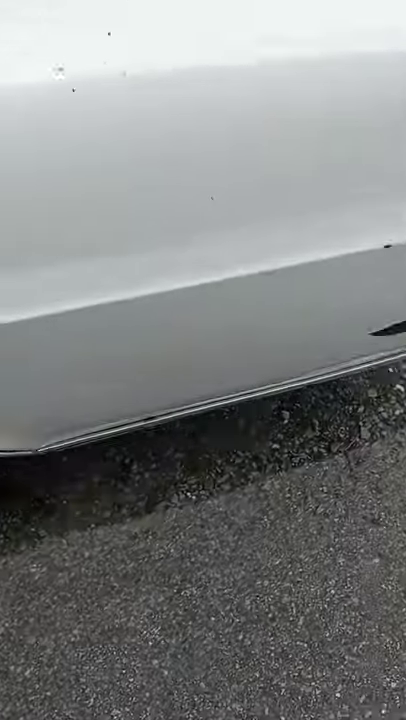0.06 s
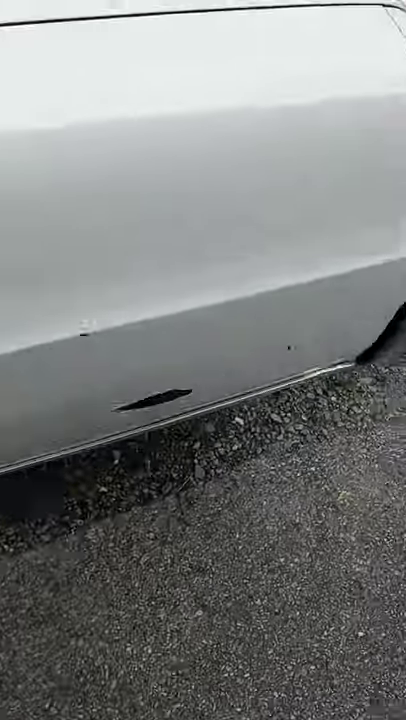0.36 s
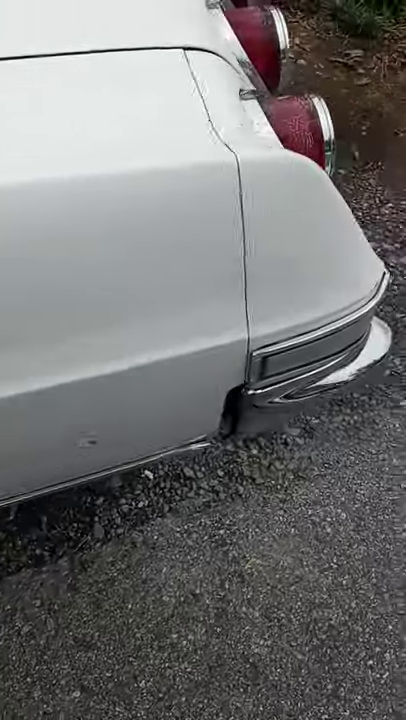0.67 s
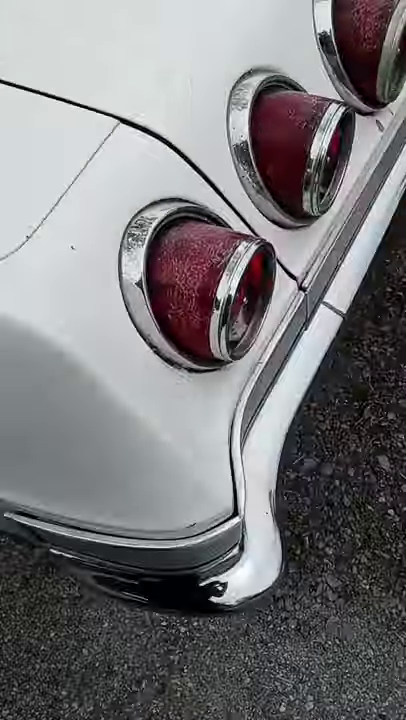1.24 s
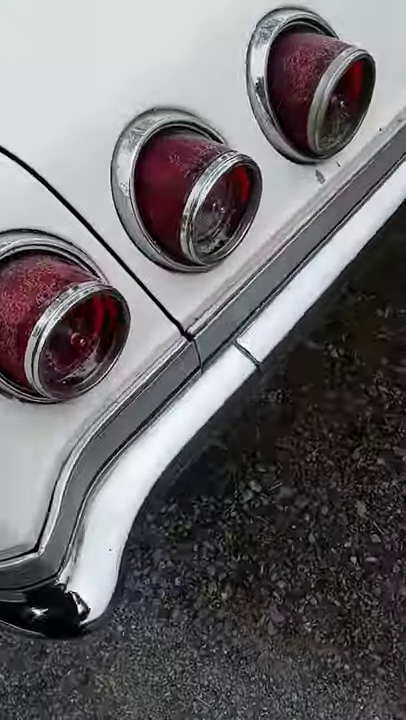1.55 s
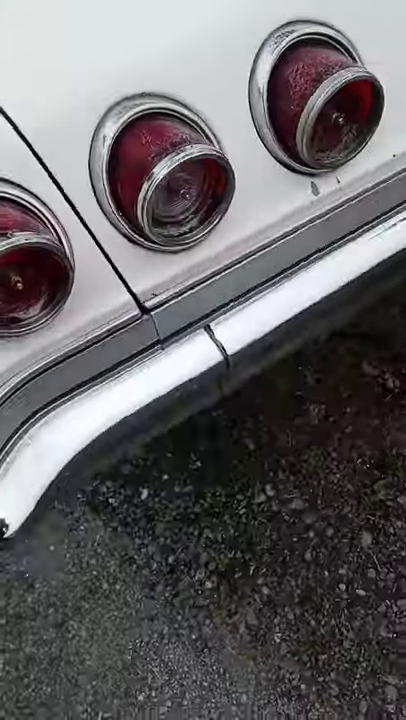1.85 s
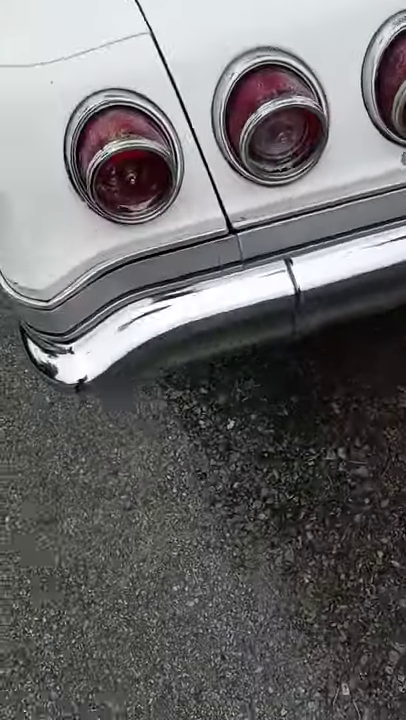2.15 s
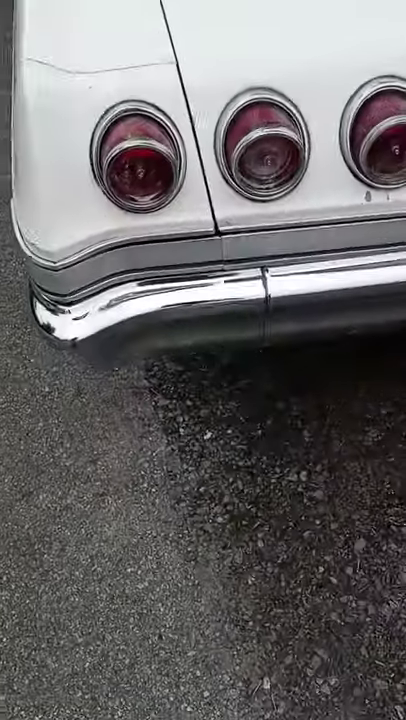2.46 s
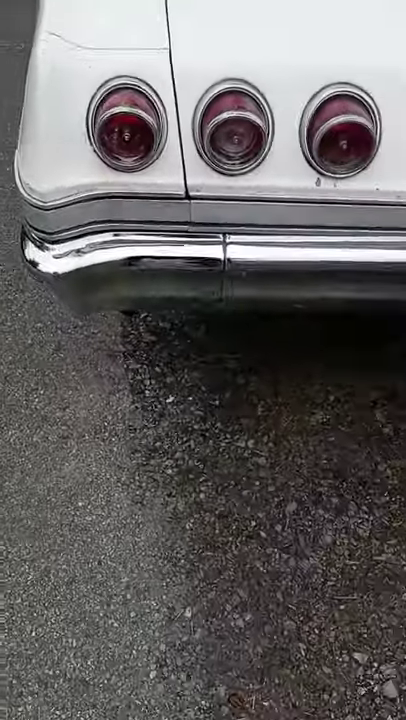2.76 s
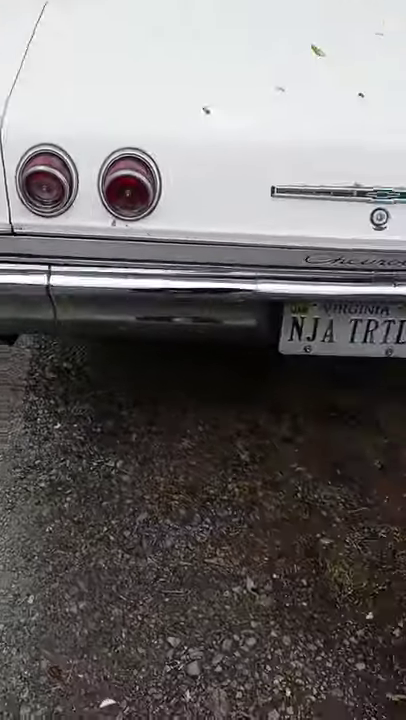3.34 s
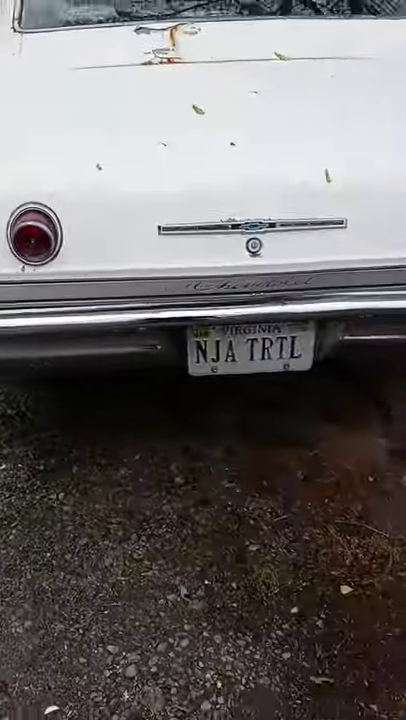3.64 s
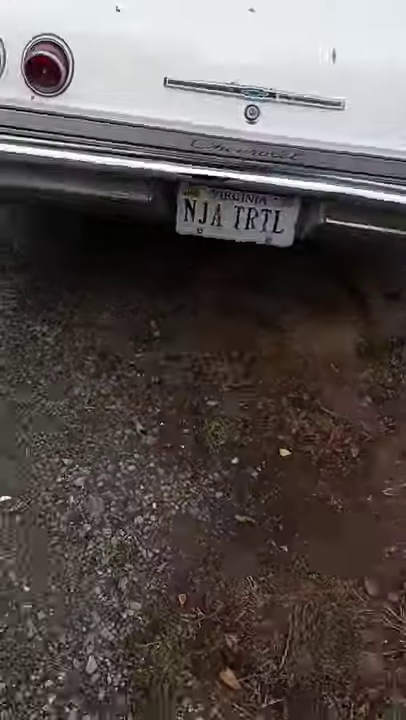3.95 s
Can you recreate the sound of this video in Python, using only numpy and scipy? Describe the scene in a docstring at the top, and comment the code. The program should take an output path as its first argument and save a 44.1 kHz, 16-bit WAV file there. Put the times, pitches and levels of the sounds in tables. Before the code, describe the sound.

Lumpy, chugging exhaust of an idling old car, with a few steps on gravel.

```python
"""An old car idles slowly and lumpily, its exhaust beating in rounds of four unequal chuffs.
Each chuff thumps the silencer, rings the tailpipe, chirps, rasps and hisses, with weaker puffs between.
Almost at once, shoes start to crunch the gravel; from about one second they also scuff and snap stones.
Near two seconds the engine slows a little. From 2.3 to 2.7 seconds the walker comes round behind the
car, where the exhaust changes tone and its hoarse burr fades. The idling and steps go on to the end."""
import sys
import numpy as np
from scipy import signal
from scipy.fft import rfft, irfft
from scipy.io import wavfile
from scipy.ndimage import uniform_filter1d

SR = 44100
rng = np.random.default_rng(int(sys.argv[2]) if len(sys.argv) > 2 else 0)


def store_wav(level_fs):
    """Save 16-bit WAV to argv[1]."""
    pcm = np.round(np.clip(np.atleast_2d(level_fs), -1, 1) * 32767)
    wavfile.write(sys.argv[1], SR, pcm.T.astype(np.int16))


N = 176400  # four seconds
TIME = np.arange(N) / SR
WALK_ROUND_S = (2.32, 2.7)  # the walker comes round to the tailpipe

# Exhaust chuffs. Each row: start in seconds, then relative dB of thump, pipe ring, chirp, rasp and hiss.
CHUFF_BEATS = [(-0.006, -3.0, 5.5, -21, -4.5, -0.5), (0.0752, 0, 3.5, -18, 2, -2.5),
               (0.1427, -4.5, 4, 4.5, -1.5, 1), (0.2211, -0.5, 0.5, 2.5, 0.5, 1),
               (0.299, -1, 4.5, -10, -2.5, -6), (0.3764, -2.5, 3.5, -3.0, -2.5, -4.5),
               (0.4468, -7, -4, 3.5, 1, -1), (0.5224, 0.5, -3.5, -1, 6.5, -1),
               (0.596, -1.5, 5, -16, -1.5, -6), (0.6779, -1.5, -3, -14, 0.5, -1.5),
               (0.7444, -4, -3.5, 3.0, -9, 1.5), (0.8198, 0.5, -1, -6.0, 4.5, 2),
               (0.897, -1.5, 4.5, -5, 0.5, -13.5), (0.9682, -0.5, 0.0, -16, -4.0, -8.5),
               (1.0404, -3, -5, 6, 2, -2), (1.1131, 1.0, 3, 7.5, -3.5, 10.5),
               (1.193, 1.0, 7, -11, -2.5, -8), (1.265, 1.5, 4, -22, -4, -5),
               (1.3355, -2.5, -3, -15, -23, 1), (1.4074, 1, -2.5, 2, -0.5, -2.5),
               (1.482, 1.5, 8, -5, -6.5, -9), (1.5566, 2, 5, 2.5, -5, -8.0), (1.6252, -1.5, 2, 6, 5.5, -3),
               (1.705, 2.5, 0.5, 13, 5.5, 1), (1.784, -1, 3, 8, -6, -9),
               (1.8644, 1.5, -4.5, -13.5, 0.5, -9), (1.9341, -0.5, -2.5, 6, 0.5, 0.5),
               (2.0185, 2, -2.0, 10.5, 2.5, 2), (2.0978, 0.0, 5.5, -13, 2.0, -19),
               (2.1746, 1, -4.5, 3.5, 1, -11), (2.2488, -1.5, -6.5, -33, 0.5, -1.5),
               (2.3312, 1.0, -4, -4, 3.5, 2), (2.416, 0.5, 5.5, -4, -4.5, -6.5),
               (2.4967, 1, 4.5, -8, 0.5, 1), (2.5802, 1, -8.5, -2, 0, 5.5), (2.668, 0, -19, -2, 7, 4.5),
               (2.7503, -0.5, 1, 0, 2, -7), (2.8357, -0.5, -2, 0.5, 3.5, 2.5),
               (2.9266, -3.0, -9, -13.5, -13, 0), (3.0156, 0, -6, -1, -11, 6),
               (3.0993, -0.5, 2.5, 3, 1, -3), (3.1808, -0.5, 4, 7.5, 5, 3),
               (3.2664, -1, -4, -23, -0.5, 1.5), (3.3514, -0.5, -22, 2.5, 6.5, 2),
               (3.4308, -2, 4, -4, 7.5, -2.5), (3.5096, -0.5, -11, 5.5, 5, 3.5),
               (3.5859, -3.5, -4, -22, -0.5, 4), (3.6753, -0.5, -5, -12, 3, 1.0),
               (3.7517, -1.5, -1.5, -3, 2.5, -3.5), (3.8242, 0, -3, -9, 2, -0.5),
               (3.8994, -3.5, -4, -16, 0, -3), (3.9743, 1, -11, 0, 6.5, -6)]
# Weaker firings between chuffs. Each row: place in the gap from 0 to 1, dB relative to the chuff.
WEAK_FIRINGS = [(0.252, -2), (0.491, -4), (0.763, -7)]
# Deep booms of the silencer. Each row: pitch in Hz, level in dB, length in seconds.
BOOM_TONES = [(79.6, -20.5, 0.074), (141.9, -28.5, 0.056), (205, -38.5, 0.049)]
# Ringing notes of the silencer and the pipe.
# Each row: pitch in Hz, level in dB, seconds to fade by 60 dB, change behind the car in dB.
SILENCER_NOTES = [(123, -42.5, 0.2, -64), (203, -34, 0.065, 1), (247.4, -50.5, 0.12, 2.5),
                  (290.5, -47.5, 0.22, 7.5), (386.3, -41, 0.097, 1.5), (461, -40.5, 0.069, -11),
                  (573, -35, 0.034, -13)]
PIPE_NOTES = [(665.4, -39, 0.18, -6.5), (748.7, -32.5, 0.092, 0), (798, -41, 0.086, 4.5),
              (870, -40, 0.11, -9)]
# High pipe resonances. Each row: pitch in Hz, width in Hz, level in dB, change behind the car in dB.
RASP_BANDS = [(1310, 640, -10, -7), (1546, 34, -7.5, -3), (1891, 75, -5.5, 5), (2535, 185, -6, -3),
              (3330, 230, -5, 0.5), (3864, 137, -5.5, -6.5), (4580, 700, -11.5, -9)]
# The second hiss of each chuff. One relative level in dB for each of the four chuffs in a round.
SECOND_HISS_DB = [-1, 0.5, 1.5, -10.5]
# The tone of each noise. Each row: frequency in Hz, relative level there in dB.
FLUTTER_SPECTRUM = [(30, -34), (60, -11), (120, 11.5), (220, -5), (330, -10), (480, -20), (800, -6.5),
                    (1100, -53), (3000, -45)]  # gas pushed out of the silencer
BURR_SPECTRUM = [(200, -27), (420, -1), (560, 1.5), (900, -6), (1100, -9.5), (2500, -26)]  # hoarse gas under the side of the car
HISS_SPECTRUM = [(300, -5), (1000, -1.5), (2000, 3.5), (3300, -1), (4400, 2.5), (5700, -3.5), (6900, 3.5),
                 (8200, -4), (12000, -5.5), (16000, -8)]  # gas leaving the pipe
RUMBLE_SPECTRUM = [(25, -33), (45, -12), (80, 8.5), (150, 0.5), (300, -10), (600, -34), (2000, -45)]  # the engine's steady rumble
AIR_SPECTRUM = [(200, 17), (700, 6), (1200, 3.5), (3000, 2), (5500, -7), (7000, -11.5), (9000, -6.5),
                (14000, -18.5), (16000, -20)]  # the open air
GRAVEL_SPECTRUM = [(300, 8), (1300, -16), (2500, 2.5), (4500, 5.5), (5700, 7.5), (7500, 10), (10000, 7.5),
                   (14000, 7.5), (16000, 11.5)]  # grinding stones
SCUFF_SPECTRUM = [(300, -12), (800, -4), (1500, 4.5), (2300, -6), (4000, -10), (9000, -16)]  # dragging soles
# Shoes crunching and dragging. Each row: middle in seconds, half length in seconds, level in dB.
SHOE_CRUNCHES = [(0.144, 0.048, -44), (0.586, 0.0028, -37), (1.08, 0.0043, -33), (1.089, 0.0086, -32),
                 (1.117, 0.0096, -38), (1.133, 0.0025, -24.5), (1.148, 0.013, -37.5), (2.066, 0.0035, -40),
                 (2.07, 0.025, -30), (2.615, 0.027, -42), (2.645, 0.0045, -35), (2.66, 0.0085, -24.5),
                 (2.67, 0.0046, -25.5), (2.681, 0.0021, -26), (2.691, 0.0096, -27), (2.9802, 0.002, -24.5),
                 (2.986, 0.003, -26.5), (3.014, 0.0075, -33.5), (3.251, 0.012, -32.5), (3.6, 0.004, -38),
                 (3.626, 0.03, -42), (3.827, 0.029, -40)]
SHOE_DRAGS = [(1.108, 0.082, -42), (2.646, 0.025, -47), (3.117, 0.036, -40), (3.616, 0.081, -43.5),
              (3.822, 0.12, -44)]
# Single stones snapping. Each row: start in seconds, level in dB, pitch in Hz.
STONE_SNAPS = [(1.144, -15.5, 4200), (2.063, -19, 4400), (2.065, -11, 9800), (2.070, -20, 10500),
               (2.077, -26, 9500), (2.6559, -17, 3760), (2.671, -19, 4090), (2.796, -26, 8300),
               (3.133, -26, 1560), (3.649, -26.5, 1590)]


def amp(db):
    """Turns decibels into a number to multiply by."""
    return 10 ** (np.asarray(db) / 20)


def unit(x):
    """Scales a signal to an average (rms) level of 1."""
    return x / np.sqrt(np.mean(x ** 2) + 1e-20)


def noise():
    """White noise as long as the scene."""
    return rng.standard_normal(N)


def colour(x, spectrum):
    """Shapes the lows and highs of a sound, and sets its level to 1."""
    hz, db = np.transpose(spectrum)
    curve_db = np.interp(np.log(np.fft.rfftfreq(N, 1 / SR) + 1), np.log(hz), db)
    return unit(irfft(rfft(x) * amp(curve_db), N))


def drift(rate_hz):
    """A smooth random wobble at level 1."""
    return unit(irfft(rfft(noise()) * np.exp(-(np.fft.rfftfreq(N, 1 / SR) / rate_hz) ** 2), N))


def resonate(x, hz, width_hz):
    """Keeps the band round a steady or moving pitch, at level 1."""
    spin = np.exp(2j * np.pi * np.cumsum(hz * np.ones(N)) / SR)
    pole = np.exp(-np.pi * 1.5 * width_hz / SR)
    # shift the band down to 0 Hz, smooth it, shift it back
    smooth = signal.lfilter([(1 - pole) ** 2], [1, -2 * pole, pole * pole], x / spin + 1e-18)
    return unit((spin * smooth).real)


def add(mix, start_s, sound):
    """Mixes a sound in, cutting off whatever does not fit."""
    at = round(start_s * SR)
    sound = sound[max(-at, 0):]
    part = mix[max(at, 0):][:len(sound)]
    part += sound[:len(part)]


def swell(t, rise_s, decay_s):
    """The loudness of one puff: it swells quickly and dies away."""
    return (1 - np.exp(-(t / rise_s) ** 2)) * np.exp(-t / decay_s)


def puffs(times, dbs, rise_s, decay_s):
    """The loudness of a whole series of puffs."""
    shape = swell(np.arange(SR // 5) / SR, rise_s, decay_s)
    power = np.zeros(N)
    for start, db in zip(times, dbs):
        add(power, start, (amp(db) * shape) ** 2)
    return np.sqrt(power)


def behind(times):
    """Where the walker is: 0 beside the car, 1 behind it."""
    return np.interp(times, WALK_ROUND_S, (0, 1))


def firings(times, gaps, dbs, weak_shift_db, jitter_s=0.00062, scatter_db=1.5):
    """Times and levels of every chuff and of the weaker, uneven firings after it."""
    place, drop_db = np.transpose(WEAK_FIRINGS)
    weak_times = (times[:, None] + gaps[:, None] * place).ravel()
    weak_dbs = (dbs[:, None] + drop_db + weak_shift_db).ravel()
    later, louder = rng.standard_normal((len(weak_times), 2)).T
    return np.append(times, weak_times + jitter_s * later), np.append(dbs, weak_dbs + scatter_db * louder)


def ring(times, dbs, notes, rise_s, wander, wander_hz, scatter_db):
    """Pressure kicks ring notes. Gas flow bends their pitch; their balance shifts behind the car."""
    t, out = np.arange(SR // 4) / SR, np.zeros(N)
    for hz, db, fade_s, behind_db in notes:
        kicks = np.zeros(N)
        for start, kick_db in zip(times, dbs + scatter_db * rng.standard_normal(len(times))):
            add(kicks, max(start, 0), amp([kick_db]))
        spin = np.exp(2j * np.pi * np.cumsum(hz * (1 + wander * drift(wander_hz))) / SR)
        shape = swell(t, rise_s, fade_s / np.log(1000))
        note = (spin * signal.oaconvolve(kicks / spin, shape)[:N]).imag  # each kick starts a fading tone
        out += amp(db + behind_db * behind(TIME)) * note
    return out


def silencer(times, gaps, thump_db):
    """Each chuff booms; every firing knocks the silencer and pushes out a flutter of gas."""
    t, boom = np.arange(SR // 6) / SR, np.zeros(N)
    thump = -sum(amp(db) * np.exp(-(t / length) ** 3) * np.sin(2 * np.pi * hz * t)
                 for hz, db, length in BOOM_TONES)
    thump *= 1 - np.exp(-t / 0.0095)  # soften the start
    for start, db in zip(times, thump_db):
        add(boom, start - 0.004, amp(db) * thump)
    at, dbs = firings(times, gaps, thump_db + 2, weak_shift_db=0)
    flutter = amp(-34.5) * colour(noise(), FLUTTER_SPECTRUM)
    flutter *= puffs(at - 0.002, dbs, rise_s=0.0017, decay_s=0.025)
    knocks = ring(at, dbs, SILENCER_NOTES, rise_s=0.0016, wander=0.027, wander_hz=4.4, scatter_db=3.5)
    return boom + knocks + flutter


def tailpipe(times, gaps, ring_db):
    """The firings ring the pipe with a hollow burble, over a hoarse burr that fades behind the car."""
    at, dbs = firings(times, gaps, ring_db, weak_shift_db=-1 - 3.1 * behind(times)[:, None])
    burr = amp(-41.5 - 23 * behind(TIME)) * colour(noise(), BURR_SPECTRUM)
    burr *= puffs(at - 0.002, 0.31 * dbs, rise_s=0.0017, decay_s=0.021)
    burble = ring(at - 0.003, dbs, PIPE_NOTES, rise_s=0.0034, wander=0.01, wander_hz=6.9, scatter_db=2.57)
    return burr + burble


def latest_chuff(times):
    """For every sample, the number of the chuff that began last."""
    return np.maximum(np.searchsorted(times, TIME) - 1, 0)


def chirp(times, gaps, chirp_db, fall_hz_per_s=8400):
    """Each chuff opens with a short falling chirp, lower as the engine slows."""
    chuff = latest_chuff(times)
    speed = gaps.mean() / uniform_filter1d(gaps, size=4)  # 1 is the average engine speed
    start_hz = 2014 * speed[chuff] ** 0.61
    hz = start_hz - fall_hz_per_s * np.minimum(TIME - times[chuff], 0.016)
    tone = np.sin(2 * np.pi * np.cumsum(hz) / SR)
    breath = amp(-9) * resonate(noise(), hz, width_hz=150)
    return amp(-21) * (tone + breath) * puffs(times, chirp_db, rise_s=0.0081, decay_s=0.0044)


def rasp(times, rasp_db, scatter_db=1.5, detune=0.04):
    """Each chuff rasps in the pipe's high resonances, with a tone and pitch of its own."""
    out, chuff = np.zeros(N), latest_chuff(times)
    for hz, width, db, behind_db in RASP_BANDS:
        louder, higher = rng.standard_normal((len(times), 2)).T
        dbs = rasp_db + behind_db * behind(times) + scatter_db * louder
        bursts = noise() * puffs(times, dbs, rise_s=0.0021, decay_s=0.016)
        shift_hz = np.clip(hz * detune * higher, -width / 2, width / 2)
        out += amp(db) * resonate(bursts, hz + shift_hz[chuff], width)
    return amp(-48.5) * out


def gas_bursts(times, dbs, rise_s, decay_s, ripple_db, size=4096):
    """Bursts of hiss, each with random resonances of its own."""
    t, out = np.arange(size) / SR, np.zeros(N)
    hz, db = np.transpose(HISS_SPECTRUM)
    curve_db = np.interp(np.log(np.fft.rfftfreq(size, 1 / SR) + 1), np.log(hz), db)
    for start, burst_db in zip(times, dbs):
        ripple = unit(uniform_filter1d(rng.standard_normal(len(curve_db)), size=90))
        burst = unit(irfft(rfft(rng.standard_normal(size)) * amp(curve_db + ripple_db * ripple)))
        add(out, start, amp(burst_db) * burst * swell(t, rise_s, decay_s))
    return out


def hiss(times, gaps, hiss_db):
    """Gas hisses out with each chuff, and once more before the next."""
    first = gas_bursts(times, hiss_db, rise_s=0.0067, decay_s=0.021, ripple_db=2.5)
    second_db = np.resize(SECOND_HISS_DB, len(times))
    second = gas_bursts(times + 0.6 * gaps, second_db, rise_s=0.0065, decay_s=0.021, ripple_db=6.5)
    return amp(-35) * first + amp(-35.5) * second


def background():
    """The steady rumble of the engine and the open air."""
    return amp(-37) * colour(noise(), RUMBLE_SPECTRUM) + amp(-44) * colour(noise(), AIR_SPECTRUM)


def gravel(grains_per_s=5000, scrape=0.43, clump_hz=350, clump_db=3):
    """A shoe grinds many small stones in clumps; now and then a larger one snaps."""
    power = sum(amp(db) ** 2 * np.exp(-((TIME - middle) / half) ** 2)
                for middle, half, db in SHOE_CRUNCHES)
    grains = (rng.random(N) < grains_per_s / SR) * noise()
    grains *= amp(clump_db * drift(clump_hz))
    out = np.sqrt(power) * colour(unit(grains) + scrape * noise(), GRAVEL_SPECTRUM)
    t = np.arange(600) / SR
    for start, db, hz in STONE_SNAPS:
        snap = np.sin(2 * np.pi * hz * t) + 0.5 * rng.standard_normal(len(t))
        add(out, start, amp(db) * np.exp(-t * hz / 2) * snap)  # gone in a few cycles
    return out


def scuffs():
    """The soles drag over the ground with a dull rub."""
    loudness = sum(amp(db) * np.exp(-((TIME - middle) / half) ** 2) for middle, half, db in SHOE_DRAGS)
    return loudness * colour(noise(), SCUFF_SPECTRUM)


def scene():
    """Mixes the exhaust, the footsteps and the background into one channel."""
    times, thump_db, ring_db, chirp_db, rasp_db, hiss_db = np.transpose(CHUFF_BEATS)
    gaps = np.pad(np.diff(times), (0, 1), "edge")  # seconds to the next chuff
    exhaust = silencer(times, gaps, thump_db) + tailpipe(times, gaps, ring_db)
    exhaust += chirp(times, gaps, chirp_db) + rasp(times, rasp_db) + hiss(times, gaps, hiss_db)
    return (exhaust + gravel() + scuffs() + background())[None]


def record(dry, cutoff_hz=15800):
    """Cuts away the very highest treble."""
    low_pass = signal.firwin(511, cutoff_hz, window=("kaiser", 9), fs=SR)
    return signal.oaconvolve(dry, low_pass[None], "same")


dry = scene()
out = record(dry)
store_wav(out)
```